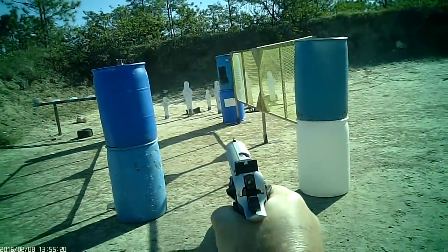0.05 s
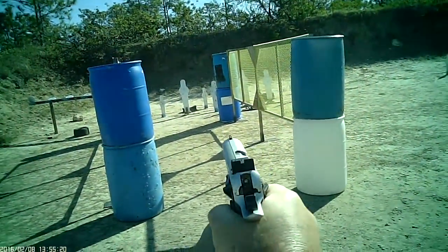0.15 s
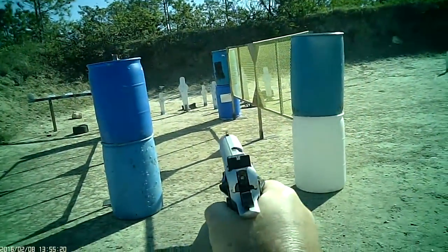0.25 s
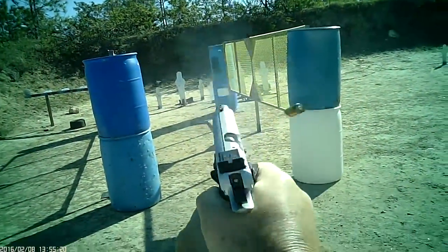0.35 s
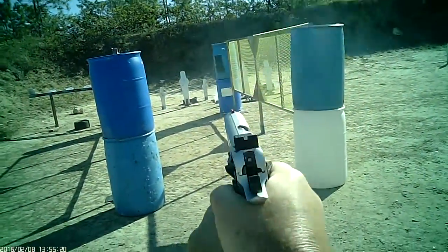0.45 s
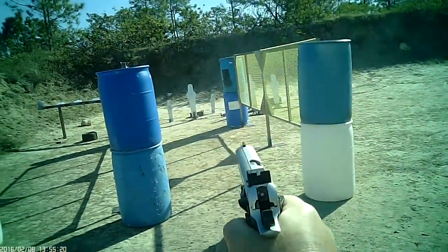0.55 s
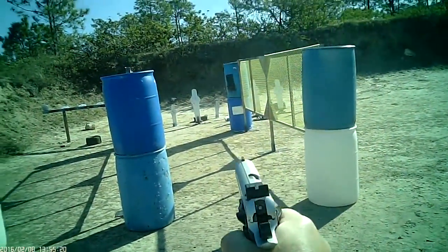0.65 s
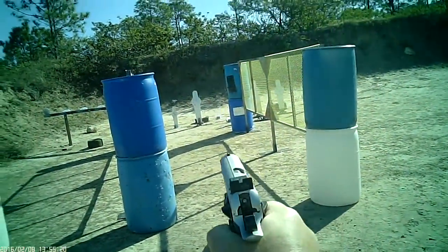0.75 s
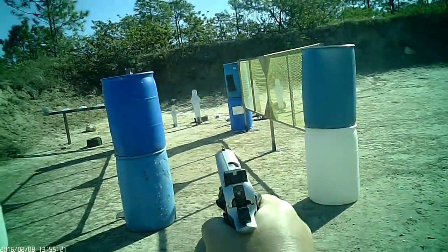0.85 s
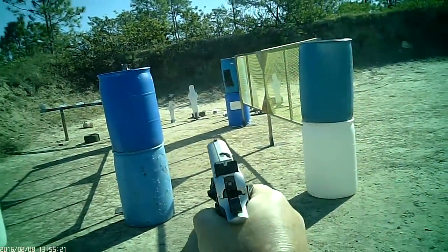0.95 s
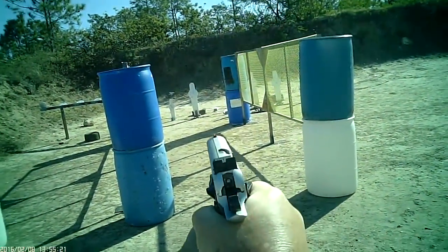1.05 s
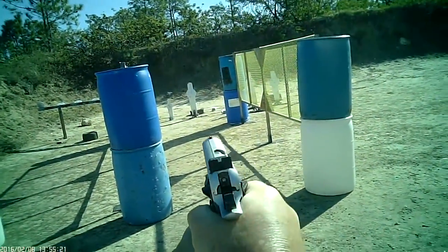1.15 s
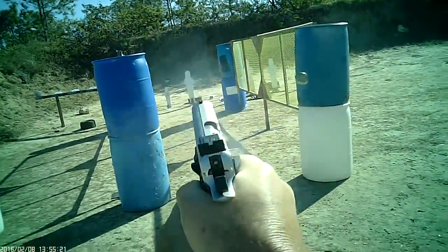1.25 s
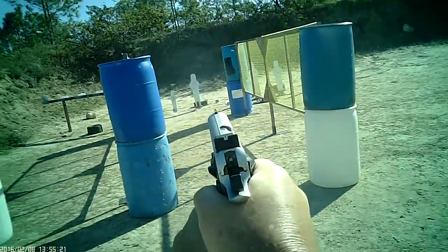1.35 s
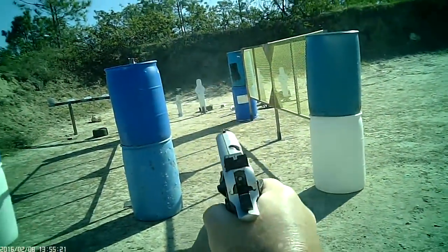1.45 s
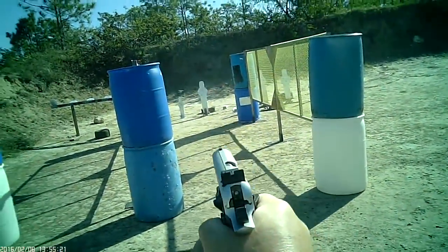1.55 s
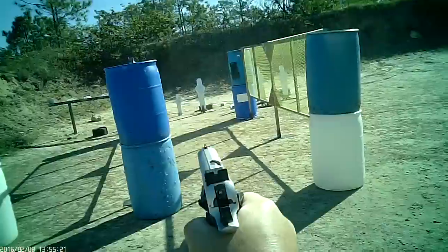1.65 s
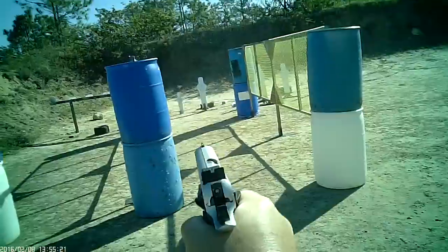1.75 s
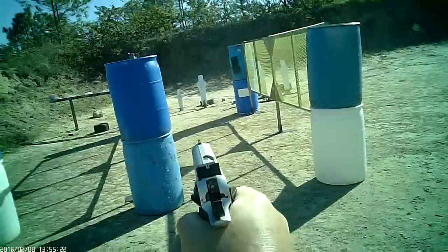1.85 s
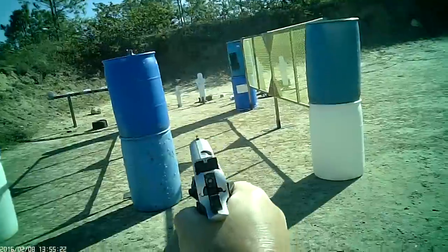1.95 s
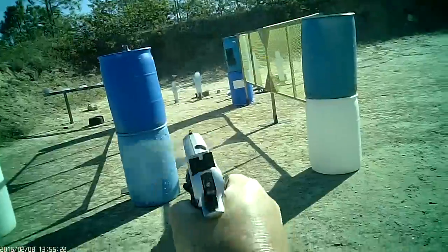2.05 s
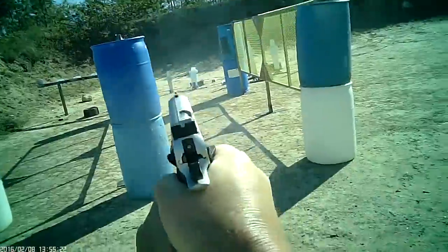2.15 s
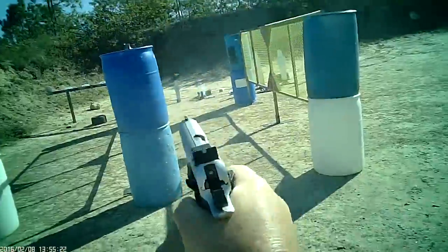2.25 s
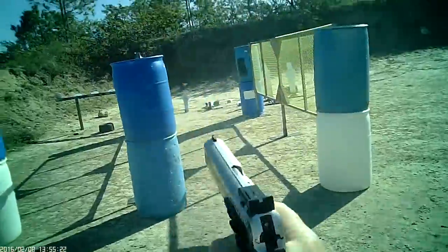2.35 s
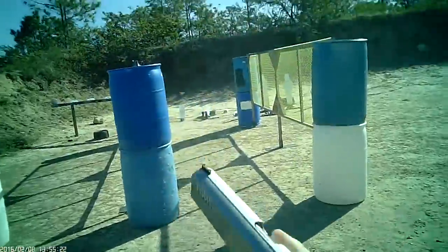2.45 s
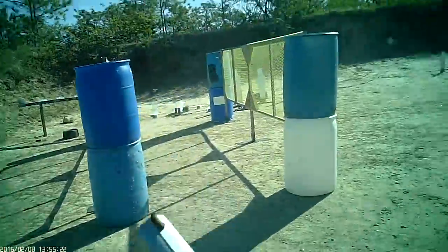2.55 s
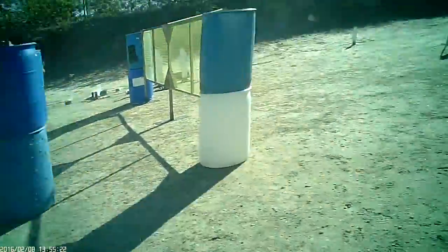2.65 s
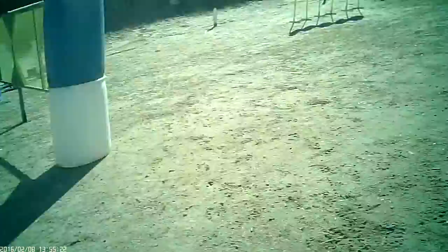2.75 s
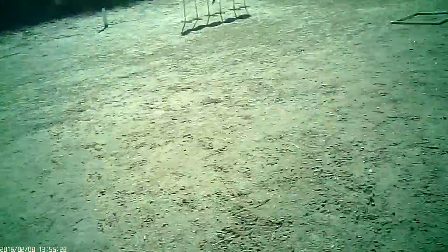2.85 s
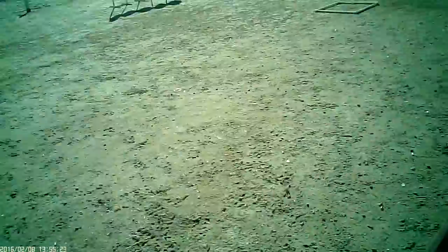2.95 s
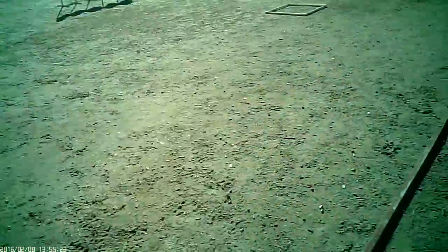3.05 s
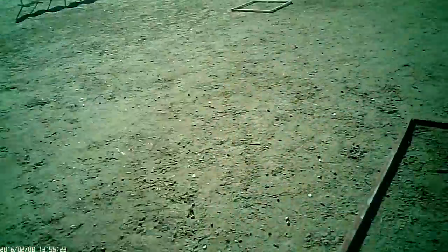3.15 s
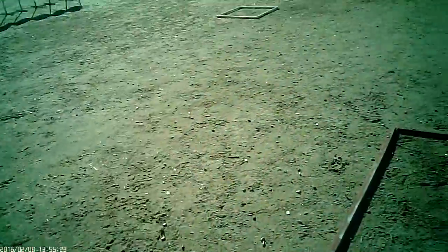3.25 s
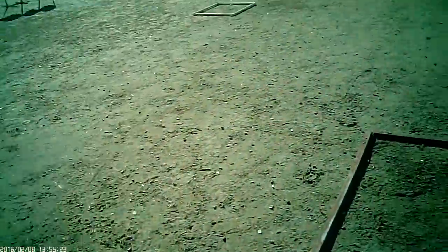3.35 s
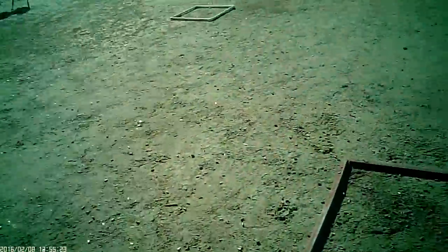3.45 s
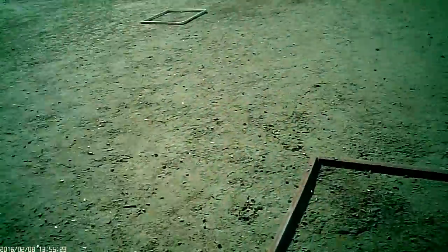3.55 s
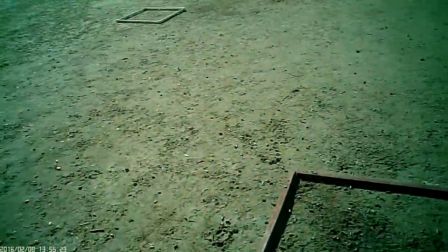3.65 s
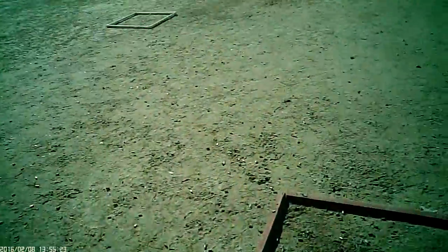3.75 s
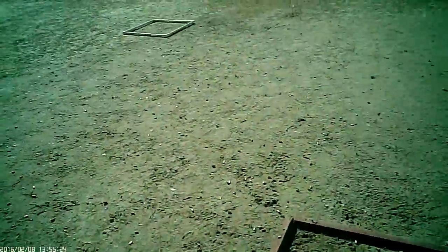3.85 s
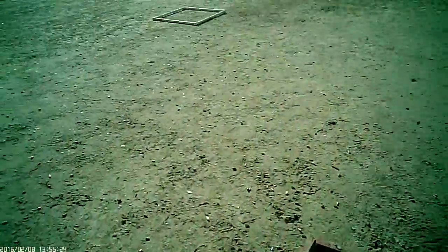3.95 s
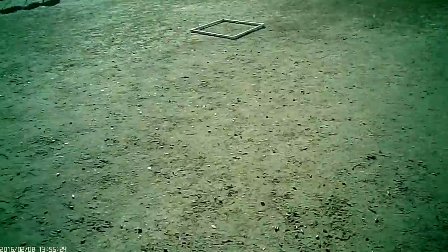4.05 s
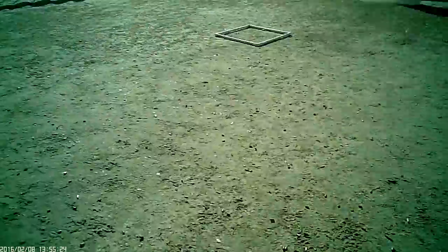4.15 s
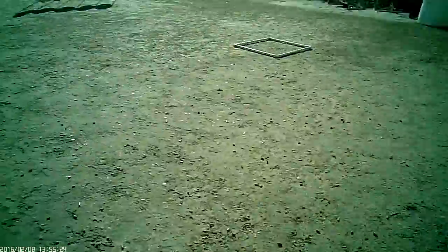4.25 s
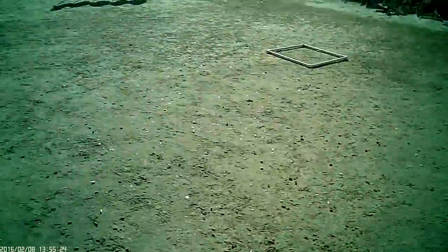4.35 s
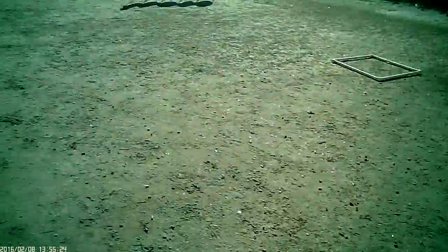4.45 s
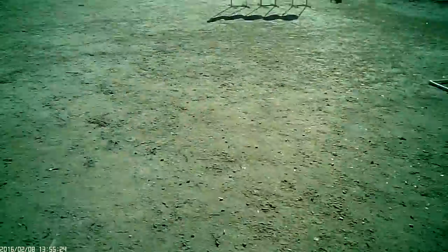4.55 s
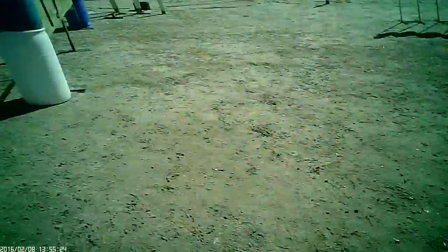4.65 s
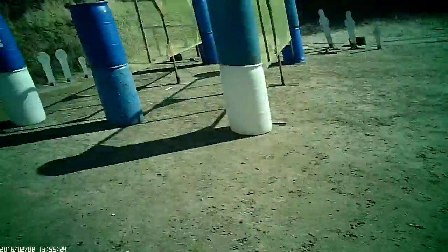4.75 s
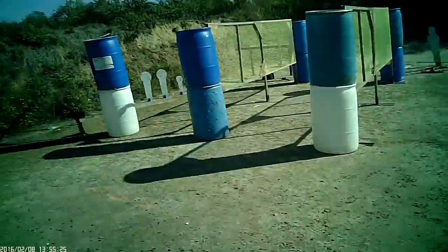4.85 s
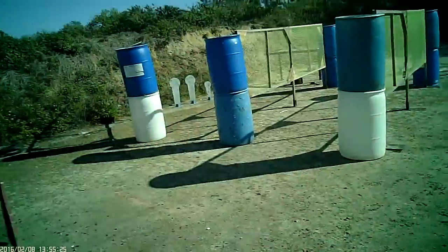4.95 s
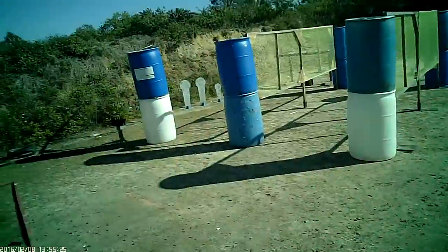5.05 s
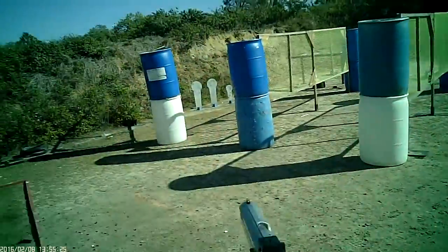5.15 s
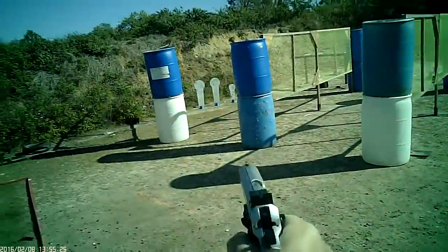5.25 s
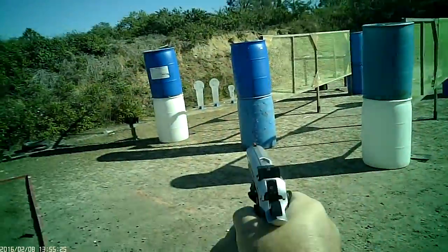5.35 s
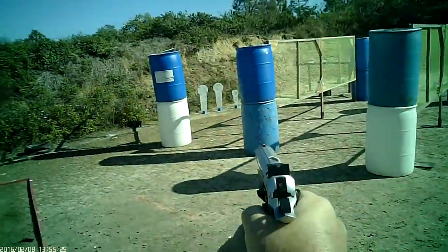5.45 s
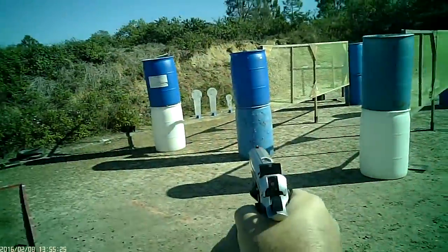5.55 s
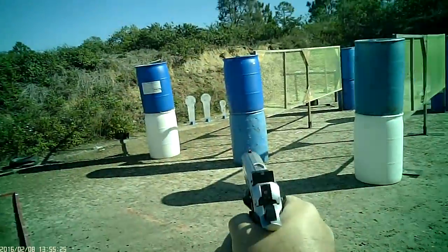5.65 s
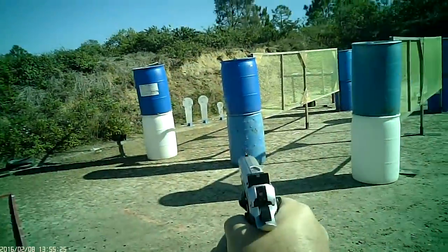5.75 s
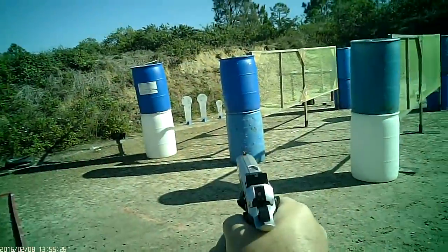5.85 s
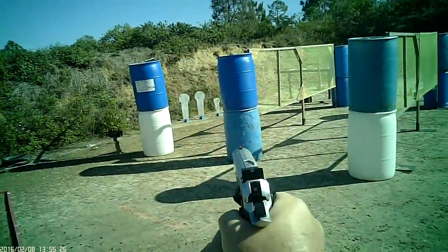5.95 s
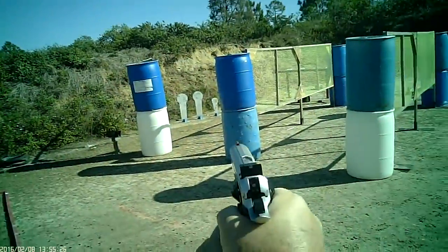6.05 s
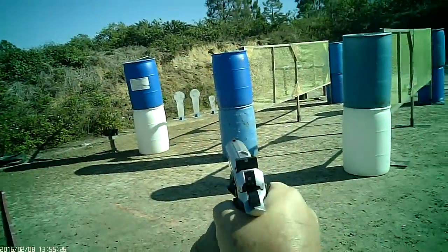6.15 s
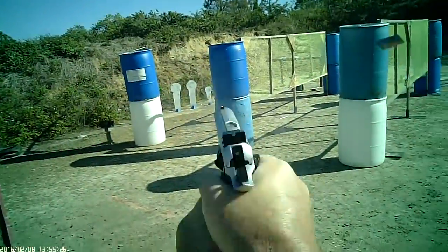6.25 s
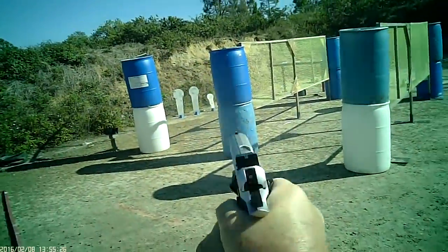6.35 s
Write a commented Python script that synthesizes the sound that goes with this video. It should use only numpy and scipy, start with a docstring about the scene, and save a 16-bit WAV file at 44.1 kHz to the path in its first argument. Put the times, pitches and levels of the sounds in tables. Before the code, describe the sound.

Faint hiss and the dying ring of an earlier shot open the scene on an outdoor range. A pistol fires very close at about 0.4, 1.2 and 2.1 seconds. Each sharp blast overloads the body-worn microphone, briefly ducks the level and echoes off the slopes, and a split second later the bullet sets a steel plate ringing. The first plate topples and bounces on its stand around 0.9 seconds. Another falls with a longer run of metallic knocks and rattles from about 2.4 to 3.5 seconds. From 2.8 seconds the shooter runs, much quieter than the shots, with rustling clothes, soft thudding steps, crunching gravel and a slight rumble of wind, stopping near 5.4 seconds. After a short lull, a fourth loud shot comes at 6.2 seconds, followed at once by a bright steel clang.

```python
"""Over faint hiss and the dying ring of an earlier shot, a pistol fires three times on an outdoor range.
Each blast echoes off barrels, screens and slopes; a moment later the bullet sets a steel plate ringing.
Two tall plates topple and bounce on their stands; the shooter runs over gravel and fires a fourth shot.
The microphone, worn on the body, overloads at every blast; its gain ducks and climbs back afterwards."""
import sys
import numpy as np
from scipy import signal
from scipy.fft import rfft, irfft, next_fast_len
from scipy.io import wavfile
from scipy.ndimage import uniform_filter1d

SR = 44100
rng = np.random.default_rng(int(sys.argv[2]) if len(sys.argv) > 2 else 0)


def put_to_file(sound):
    """Save the sound as 16-bit audio at rate SR, in the file named by the first command-line argument."""
    columns = np.atleast_2d(sound).T  # one column per channel
    safe = np.clip(columns, -1, 1)
    whole_steps = np.round(safe * 32767)
    wavfile.write(sys.argv[1], SR, whole_steps.astype(np.int16))


N = 282681
T = np.arange(N) / SR

# Pistol shots. Each row: start in seconds, gain in dB, stance (0 or 1).
PISTOL_SHOTS = [(0.361, 4.5, 0), (1.2453, 4.5, 0), (2.0998, 5.5, 0), (6.2213, 5.5, 1)]
# Bullets on steel. Each row: start in seconds, splash in dB, clang in dB, nominal clang t60 in seconds.
BULLET_STRIKES = [(0.4366, 0.5, -23.5, 0.93), (1.3149, 6, -45.5, 1), (2.171, -0.5, -24, 1),
                  (6.2898, -1, -26, 0.92)]
# Modes of the two tall plates. Each row: frequency in Hz, level under the bullet in dB,
# t60 under the bullet in seconds, relative level on landing in dB.
FIRST_TALL_MODES = [(1172.4, -23, 2.3, -7), (1307, -39.5, 0.95, -8), (1590, -36, .9, -23.5),
                    (1692, -20, 0.89, 4.5), (2115, -26, 0.92, -10), (2226, -35.5, 1.4, -5),
                    (2480, -19, 0.75, -20.5), (2750, -23.5, 0.85, -10), (2794, -32.5, 1.2, -17.5),
                    (3250, -37, 1.1, -23.5), (3573, -34, 1.0, -26), (3274, -45.5, 1.3, -13.5),
                    (3720, -40.5, 1.4, -9.5), (4334, -45, .7, -16), (4037, -35.5, 1.6, -18),
                    (3740, -14.5, .25, -25.5), (4010, -12, 0.24, -30), (4776, -36.5, 0.75, -15.5),
                    (5360, -36.5, 0.93, -33.5), (6550, -33.5, 0.49, -12), (6640, -35.5, 1.25, -36.5),
                    (8650, -34, 0.31, -35)]
SECOND_TALL_MODES = [(1194, -24.5, 3.2, -1.5), (1262, -35.5, 1.1, 2.5), (1690, -31.5, 4.7, 5),
                     (2110, -26, 1.6, -5), (2253, -36.5, 1.2, 3), (2536, -29.5, 3.1, -8.5),
                     (2815, -36, 2.6, -11), (2945, -28.5, 0.79, -10), (3140, -36.5, 0.98, -13),
                     (3370, -38.5, 0.98, -9), (3760, -36.5, 1.5, -24), (3740, -30.5, 1.14, -14),
                     (4060, -23.5, 0.57, -22), (5000, -37.5, 1, -11), (5440, -39, 3.1, -21),
                     (5770, -51, 0.41, -16), (6600, -37.5, 2.5, -19), (6400, -34.5, 0.59, -43),
                     (6670, -3, 0.13, -56), (7120, -34, 1.06, -16), (9540, -26, 0.29, -38.5)]
# Spectra of the roll from the slopes, a dull impact, the bay's reverberation and a plate's knock.
# Each row: frequency in Hz, relative level in dB.
SLOPE_SPECTRUM = [(50, -23.5), (150, -10), (350, -8), (600, -3.5), (900, 1), (1200, -7), (1600, 0),
                  (2200, -16), (4000, -16), (6000, -24), (8000, -37.5), (15000, -50)]
THUD_SPECTRUM = [(30, -28), (100, -8.5), (220, 0), (350, -8), (600, -14), (2000, -14), (8000, -49)]
BAY_SPECTRUM = [(50, -19), (150, -5.5), (380, -1), (620, -4), (950, 1.5), (1200, -3.5), (1600, 1.5),
                (2200, -17.5), (4000, -14.5), (6800, -20.5), (8000, -34), (10000, -26.5), (15000, -31)]
KNOCK_SPECTRUM = [(100, -35), (350, -14.5), (650, -12), (900, 0), (1150, -5.5), (1400, 3.5), (1650, 11),
                  (2000, -9), (3000, -16.5), (4800, -21), (6000, -28), (7000, -17.5), (8000, -42.5),
                  (10000, -26), (15000, -54.5)]

FALL_S, SETTLE_S = 0.484, 0.61   # a tall plate falls for this long, then bounces until its ring is choked
RUN_START_S, RUN_END_S = 2.75, 5.43


def from_db(db):
    """Amplitude ratio of a level in decibels."""
    return 10 ** (np.asarray(db) / 20)


def rms_one(x):
    """Normalisation to unit rms."""
    return x / np.sqrt(np.mean(x ** 2) + 1e-20)


def at_hz(spectrum, hz):
    """Gain of a spectrum, interpolated on a log-frequency axis."""
    points, db = np.transpose(spectrum)
    return from_db(np.interp(np.log(hz + 1e-3), np.log(points), db))


def colour(x, spectrum):
    """Minimum-phase filtering: folding the cepstrum makes the response causal."""
    size = 2 * next_fast_len(len(x) // 2 + 4096)
    cepstrum = irfft(np.log(at_hz(spectrum, np.fft.rfftfreq(size, 1 / SR))))
    cepstrum[1:size // 2] *= 2
    cepstrum[size // 2 + 1:] = 0
    return irfft(rfft(x, size) * np.exp(rfft(cepstrum)))[:len(x)]


def noise(spectrum, size=N):
    """Spectral shaping of white noise, at unit rms."""
    padded = 2 * next_fast_len(size // 2 + 1)
    gains = at_hz(spectrum, np.fft.rfftfreq(padded, 1 / SR))
    return rms_one(irfft(rfft(rng.standard_normal(padded)) * gains)[:size])


def fade(t, t60, rise=1e-4):
    """Exponential decay of 60 dB in t60 seconds, after an onset with time constant `rise`."""
    t = np.maximum(t, 0)
    return (1 - np.exp(-t / rise)) * np.exp(-np.log(1000) * t / t60)


def add(out, start_s, sound):
    """Superposition: a sound joins the mix at its start time."""
    i = max(round(start_s * SR), 0)
    out[i:i + len(sound)] += sound[:max(N - i, 0)]


def wander(size, rate):
    """Random modulation of unit spread, through `rate` new values a second."""
    knots = rng.standard_normal(400)
    return np.interp(T[:size] * rate, np.arange(len(knots)), knots) * np.sqrt(3 / 2)


def air_hiss(level_db=-55.5):
    """Stationary broadband noise forms a faint floor, strongest in the bass."""
    air_spectrum = [(15, -33), (25, -9), (33, -4.5), (92, -7.5), (180, -13), (217, -15), (293, -16),
                    (575, -22), (624, -22.5), (1890, -27.5), (2220, -28.5), (14000, -32), (16000, -33.5)]   # Each row: frequency in Hz, relative level in dB.
    return from_db(level_db) * noise(air_spectrum)


def ring(modes, flutter_db=0, flutter_per_s=24, beam_hz=3500):
    """Damped modes (Hz, dB, t60): a rocking plate beams the high ones to and fro, so they flutter."""
    t, out = T[:SR], 0
    rocking = np.minimum(t / 0.08, 1)
    for hz, db, t60 in modes:
        directivity = min(hz / beam_hz, 1) ** 2
        flutter = flutter_db * directivity * rocking * wander(SR, flutter_per_s)
        out = out + from_db(db + flutter) * fade(t, t60) * np.sin(2 * np.pi * (hz * t + rng.random()))
    return out


def clang(t60, count=140, treble_damping=0.41):
    """Dense weak modes of plate and stand crowd towards the low end; damping grows with frequency."""
    mode_envelope = [(500, -8.5), (900, 1), (1600, -1.5), (2200, -6.5), (4000, -5.5), (7000, -5.5),
                     (8000, -23), (9500, -8), (11000, -14.5), (15000, -16.5)]   # Each row: frequency in Hz, relative level in dB.
    hz = np.linspace(np.sqrt(500), np.sqrt(15000), count) ** 2 * rng.uniform(0.985, 1.015, count)
    gains = at_hz(mode_envelope, hz) * from_db(rng.normal(0, 2, count))
    gains = gains / np.sqrt(np.sum(gains ** 2) / 2)
    decays = t60 * rng.uniform(0.7, 1.83, count) * (hz / hz.mean()) ** -treble_damping
    return ring(zip(hz, 20 * np.log10(gains), decays), flutter_db=5, flutter_per_s=26)


def earlier_shot(roll_db=-45.5, clang_db=-50):
    """Free decay: an earlier shot still rolls back from the slopes and rings in the steel."""
    out = from_db(roll_db) * fade(T, t60=1.315) * noise(SLOPE_SPECTRUM)
    add(out, 0, from_db(clang_db) * clang(t60=0.35))
    return out


def running_speed(speed_up_s=1.2, slow_down_s=0.35):
    """Uniform acceleration, a steady run and uniform braking, as a fraction of full speed."""
    return np.clip(np.minimum((T - RUN_START_S) / speed_up_s, (RUN_END_S - T) / slow_down_s), 0, 1)


def clothing_rustle(rest_db=-61.5, run_db=-64, turn_db=-42.5):
    """Friction in clothes and gear grows with speed and peaks in the sharp turn that starts the run."""
    cloth_spectrum = [(40, 10), (120, -3.5), (250, -9.5), (480, 3.5), (700, 2.5), (900, 3), (1100, -1),
                      (1360, 4), (1750, -5), (2200, -9.5), (4500, -21), (7000, -32.5), (12000, -35)]   # Each row: frequency in Hz, relative level in dB.
    turn = from_db(turn_db) * fade(T - RUN_START_S, t60=1.7, rise=0.11)
    effort = from_db(rest_db) + from_db(run_db) * running_speed() + turn
    return effort * noise(cloth_spectrum)


def body_thuds(recoil_delay_s=0.097, recoil_db=-21.5, toe_delay_s=0.062, toe_db=-15):
    """Damped impacts: heel and then toe meet the ground, and recoil bumps the body after each shot."""
    heel_strikes = [(0.03, -49.5), (0.572, -24.5), (2.365, -23), (2.792, -41), (3.052, -47.5),
                    (3.43, -42.5), (3.809, -49.5), (4.166, -56), (4.501, -56), (4.919, -56.5)]   # Each row: start in seconds, relative level in dB.
    envelope = np.zeros(N)
    thud = 1.5 * fade(T[:SR], t60=0.19, rise=0.00086)
    for start, db in heel_strikes:
        add(envelope, start, from_db(db) * thud)
        add(envelope, start + toe_delay_s, from_db(db + toe_db) * thud)
    for start, _, _ in PISTOL_SHOTS:
        add(envelope, start + recoil_delay_s, from_db(recoil_db) * thud)
    return envelope * noise(THUD_SPECTRUM)


def muzzle_blast(t, leak_lead_s=0.00091, crack_t60=0.016, swing_hz=72, ground_delay_s=0.008):
    """Sudden gas expansion: a leak ahead of the bullet, a crack, a pressure swing, a ground bounce."""
    crack_spectrum = [(100, -1.5), (800, 24.5), (1600, -31), (2200, 1.5), (3000, 11.5), (5200, -12),
                      (6600, 11.5), (7800, -19), (9500, 11.5), (11000, -0.5), (15000, -21.5)]   # Each row: frequency in Hz, relative level in dB.
    leak = from_db(-13) * fade(t, crack_t60, rise=0.00014)
    t = t - leak_lead_s
    burst = from_db(22) * fade(t, crack_t60, rise=0.003)
    gas = from_db(3) * fade(t, t60=0.0093)
    crack = noise(crack_spectrum, len(t)) * (leak + burst + gas)
    swing = 2 * from_db(25) * fade(t, t60=0.03, rise=0.014) * np.sin(2 * np.pi * swing_hz * t)
    ground = from_db(19) * noise(BAY_SPECTRUM, len(t)) * fade(t - ground_delay_s, t60=0.017)
    return crack + swing + ground


def reflections(t, echoes, scatter=0.096, scatter_t60=0.0091):
    """Early reflection: each barrel or screen returns a dull pulse with diffuse scatter behind it."""
    echo_spectrum = [(60, -32), (200, -15), (290, -10), (410, -3.5), (620, -11.5), (800, -5), (1000, 1.5),
                     (1200, -14.5), (1500, -2.5), (2200, -16), (4000, -43), (7000, -27.5), (8000, -42.5),
                     (15000, -43.5)]   # Each row: frequency in Hz, relative gain in dB.
    pulses = np.zeros(len(t))
    for delay, db in echoes:
        pulses[round(delay * SR)] += from_db(db)
        pulses += from_db(db) * scatter * fade(t - delay, scatter_t60) * rng.standard_normal(len(t))
    impulse_response = colour(1.0 * (t == 0), echo_spectrum)
    return colour(pulses, echo_spectrum) / np.abs(impulse_response).max()


def pistol(bank_delay_s=0.315):
    """Reverberation: after each blast and its early echoes the bay rings; slopes and a bank roll back."""
    # Barrel and screen echoes at the two stances. Each row: delay in seconds, level in dB.
    first_echoes = [(.0217, 20.5), (.0231, 22), (.0248, 22), (.0268, 18), (.0298, 7), (.0365, 7.5),
                    (.0563, 9), (.0576, 11.5)]
    second_echoes = [(0.029, 14.7), (0.0341, 13.4), (0.0405, 11.5), (0.0474, 14), (0.0517, 9.4)]
    out, t = np.zeros(N), T[:2 * SR]
    blasts = [muzzle_blast(t) + reflections(t, echoes) for echoes in (first_echoes, second_echoes)]
    bay = from_db(5) * fade(t, t60=0.29, rise=0.016)
    slopes = from_db(-29) * fade(t, t60=1.315, rise=0.04)
    bank = from_db(-39) * fade(t - bank_delay_s, t60=0.46, rise=0.0057)
    for start, db, stance in PISTOL_SHOTS:
        tail = bay * noise(BAY_SPECTRUM, len(t)) + (slopes + bank) * noise(SLOPE_SPECTRUM, len(t))
        add(out, start, from_db(db) * (blasts[stance] + tail))
    return out


def tipping_gain(t, acceleration_power=3.3, beam_power=7.8, face_db=-1, edge_db=-22.5):
    """Directivity: a plate tips ever faster, beaming its ring at the shooter until it turns edge-on."""
    angle = np.pi / 2 * np.minimum(t / FALL_S, 1) ** acceleration_power
    return from_db(face_db) * np.abs(np.cos(angle)) ** beam_power + from_db(edge_db)


def bullet_hits(splash_t60=0.051, shiver_db=-12, shiver_t60=0.24):
    """Impulse excitation: lead splashes on steel, which shivers briefly and sings in its normal modes."""
    splash_spectrum = [(300, -19), (900, 18.5), (1500, 14), (2200, 3), (3800, 8.5), (5500, -8),
                       (6900, 10.5), (8000, -16.5), (9800, 4), (12000, -9.5), (15000, -16)]   # Each row: frequency in Hz, relative level in dB.
    # Modes of the two smaller plates. Each row: frequency in Hz, level in dB, t60 in seconds.
    small_modes = [(1434, -6.5, 1.08), (5280, -20, 0.59), (7229, -30.5, 0.65), (9350, -38.5, 0.85),
                   (9819, -42.5, 0.73), (14200, -51.5, .6)]
    far_modes = [(1260, -36, 0.9), (1460, -37, 1.0), (1830, -36, .7), (2820, -32, .6), (2810, -17, 0.41),
                 (3170, -17, 0.58), (4100, -24, 0.39), (5150, -19.5, 1), (6110, -32, 0.45),
                 (6750, -24, 0.47), (6160, -24, 0.36), (6883, -33, .6), (7520, -31, .6), (9930, -25, 0.55),
                 (10700, -32, .5), (11050, -22, 0.42)]
    out, t = np.zeros(N), T[:SR]
    tipping = tipping_gain(t)
    plates = [(FIRST_TALL_MODES, tipping), (small_modes, 1), (SECOND_TALL_MODES, tipping), (far_modes, 1)]
    shiver = from_db(shiver_db) * fade(t, shiver_t60)
    for (start, splash_db, clang_db, clang_t60), (modes, beam) in zip(BULLET_STRIKES, plates):
        splash = noise(splash_spectrum, SR) * (from_db(splash_db) * fade(t, splash_t60) + shiver)
        tones = ring([mode[:3] for mode in modes], flutter_db=4)
        ringing = tones + from_db(clang_db) * clang(clang_t60)
        add(out, start, splash + beam * ringing)
    return out


def toppling(dulling_db_per_s=37, tilt_per_octave=0.3, pivot_hz=1700, damped_hz=2800, choke_t60=0.34):
    """Contact damping: a falling plate knocks on its stand and rings again, its high modes cut short."""
    # Plate meets stand. Each row: start in seconds, knock gain in dB, ring gain in dB.
    landings = [(0.921, -20.5, -34.5), (0.995, -27, -35), (1.103, -23.5, -44), (1.197, -29, -60),
                (2.41, -16.5, -63), (2.498, -19.5, -62), (2.655, -21.5, -44.5), (2.862, -33, -68),
                (2.924, -26.5, -42.5), (2.972, -14, -48.5), (3.041, -41, -41), (3.138, -26, -44.5),
                (3.205, -22.5, -63), (3.271, -35, -44.5), (3.45, -37, -53)]
    out, t = np.zeros(N), T[:SR]
    jangle_band = signal.butter(1, [1500, 4000], "band", fs=SR, output="sos")
    treble_band = signal.butter(1, 3000, "high", fs=SR, output="sos")
    jangle = from_db(-11) * signal.sosfilt(jangle_band, clang(t60=0.18))
    knock_and_echo = fade(t, t60=0.042, rise=0.0058) + from_db(-19) * fade(t, t60=0.32, rise=0.016)
    first_fall = (FIRST_TALL_MODES, BULLET_STRIKES[0][0] + FALL_S)
    second_fall = (SECOND_TALL_MODES, BULLET_STRIKES[2][0] + FALL_S)
    for _, down_s in (first_fall, second_fall):   # each fall shakes the ground
        add(out, down_s, from_db(-31) * fade(t, t60=0.18, rise=0.0028) * noise(THUD_SPECTRUM, SR))
    for start, knock_db, ring_db in landings:
        plate, down_s = first_fall if start < PISTOL_SHOTS[1][0] else second_fall
        # A landing on the edge is bright; later and harder ones fall flatter and duller.
        hardness_db = knock_db + 27   # above a usual knock
        bright_db = 4 - dulling_db_per_s * max(start - down_s, 0) - 0.56 * hardness_db
        knock = noise(KNOCK_SPECTRUM, SR) * knock_and_echo
        treble_change = (from_db(bright_db) - 1) * signal.sosfilt(treble_band, knock)
        add(out, start, 2 * from_db(knock_db) * (knock + treble_change))
        modes = []
        for hz, _, t60, landing_db in plate:
            tilt_db = tilt_per_octave * bright_db * np.log2(hz / pivot_hz)
            damped_t60 = 0.53 * t60 * min(damped_hz / hz, 1)
            modes.append((hz, ring_db + landing_db + tilt_db + rng.standard_normal(), damped_t60))
        resting_s = np.maximum(start + t - down_s - SETTLE_S, 0)
        choke = np.exp(-np.log(1000) * resting_s / choke_t60)
        add(out, start, choke * (ring(modes) + from_db(ring_db) * jangle))
    return out


def wind_buffeting(full_speed_db=-54):
    """Dynamic pressure of the air on the microphone grows as the square of the running speed."""
    buffet_spectrum = [(20, 9), (45, 2), (100, 0.5), (200, -17.5), (800, -36)]   # Each row: frequency in Hz, relative level in dB.
    return from_db(full_speed_db) * running_speed() ** 2 * noise(buffet_spectrum)


def plate_rattle(ticks_per_s=70, level_db=-47, settle_t60=2.3, tick_t60=0.13):
    """Intermittent contact: the second fallen plate chatters in random, weakening ticks as it settles."""
    start = BULLET_STRIKES[2][0] + FALL_S + SETTLE_S
    sizes = from_db(rng.normal(0, 3, N))
    ticks = (rng.random(N) < ticks_per_s / SR) * sizes * fade(T - start, settle_t60)
    decay_per_sample = from_db(-60 / (tick_t60 * SR))
    envelope = signal.lfilter([1], [1, -decay_per_sample], ticks + 1e-18)
    return from_db(level_db) * envelope * noise(KNOCK_SPECTRUM)


def gravel_crunch(grains_per_s=4000, spread_db=3):
    """Random impulses: under a scuffing sole, many tiny stone collisions merge into a crunch."""
    scuffs = [(3.478, -47), (3.609, -41.5), (3.839, -48), (4.241, -48.5), (4.27, -45.5), (4.712, -50),
              (5.203, -53.5)]   # Each row: start in seconds, relative level in dB.
    gravel_spectrum = [(100, 0), (480, 9.5), (750, -0.5), (1350, 11.5), (1750, 6), (2200, 0), (4000, -6),
                       (6800, -20), (8500, -34), (15000, -30)]   # Each row: frequency in Hz, relative level in dB.
    envelope = np.zeros(N)
    for start, db in scuffs:
        add(envelope, start, 1.5 * from_db(db) * fade(T[:SR], t60=0.15, rise=0.0019))
    grains = (rng.random(N) < grains_per_s / SR) * rng.standard_normal(N)
    sizes = from_db(spread_db * np.minimum(rng.exponential(1, N), 3))
    return envelope * rms_one(colour(grains * sizes, gravel_spectrum))


def scene():
    """Superposition of gun, steel, shooter and background in one channel."""
    gun_and_steel = earlier_shot() + pistol() + bullet_hits() + toppling() + plate_rattle()
    shooter = clothing_rustle() + body_thuds() + wind_buffeting() + gravel_crunch()
    return (gun_and_steel + shooter + air_hiss())[None]


def gain_control(x, threshold_db=-7, depth_db=18, release_db_per_s=48, attack_s=0.0042):
    """Compression: loud sound pulls the gain down quickly, and it climbs back at a steady rate."""
    excess_db = np.clip(20 * np.log10(np.abs(x) + 1e-9) - threshold_db, 0, depth_db)
    release_ramp = release_db_per_s * T
    held_db = np.maximum.accumulate(excess_db + release_ramp, axis=-1) - release_ramp
    pole = np.exp(-1 / (attack_s * SR))
    return x * from_db(-signal.lfilter([1 - pole], [1, -pole], held_db))


def record(dry, clip_level=0.71, cutoff_hz=16000, dc_offset=-0.0074):
    """Overload: peaks that outrun the gain control clip; a steep low-pass and a slight offset follow."""
    clipped = np.clip(gain_control(dry), -clip_level, clip_level)
    lowpass = signal.ellip(10, 0.1, 80, cutoff_hz, fs=SR, output="sos")
    return signal.sosfilt(lowpass, clipped) + dc_offset


dry = scene()
out = record(dry)
put_to_file(out)
```